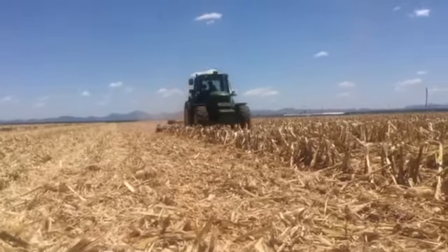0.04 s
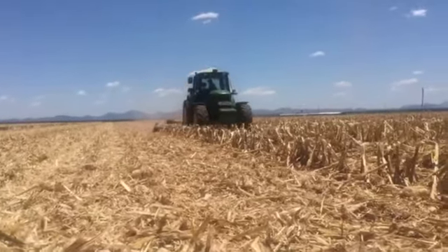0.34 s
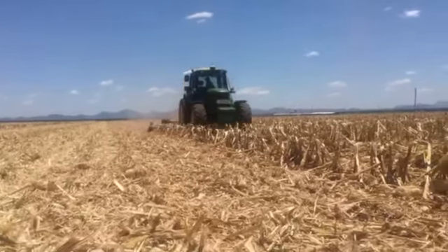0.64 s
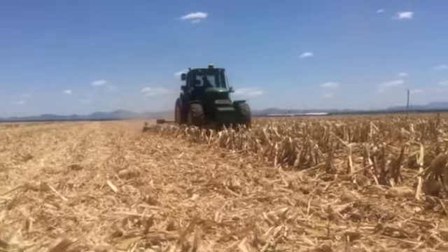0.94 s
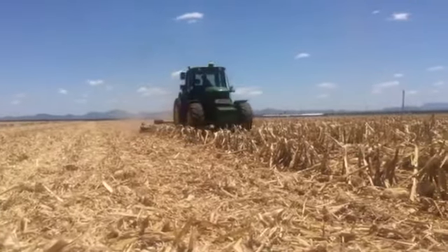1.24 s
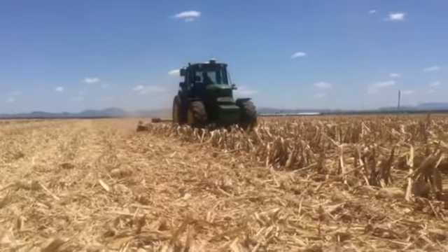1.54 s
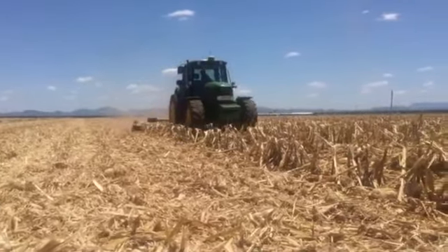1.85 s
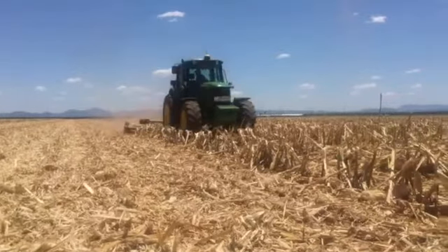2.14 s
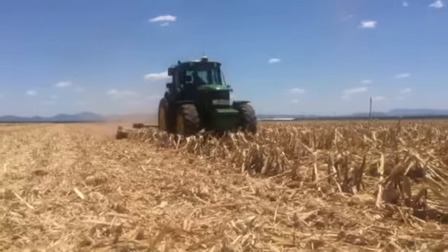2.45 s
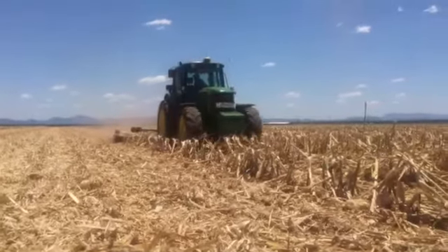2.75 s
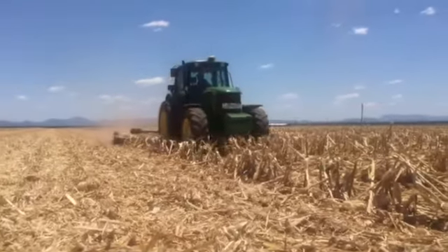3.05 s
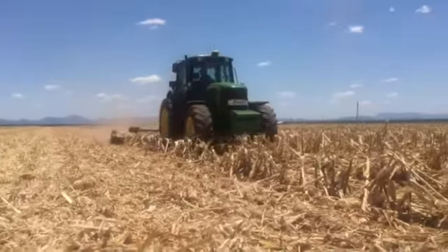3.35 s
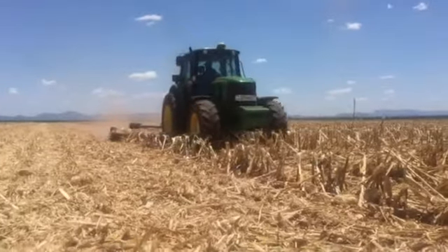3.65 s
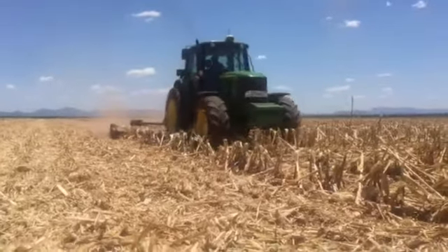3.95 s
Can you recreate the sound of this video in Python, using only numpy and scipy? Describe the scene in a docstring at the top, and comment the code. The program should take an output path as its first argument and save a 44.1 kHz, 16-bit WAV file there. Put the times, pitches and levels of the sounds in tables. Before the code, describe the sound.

A diesel tractor drones throughout the four seconds, with a low rumble, even knocking, fan hum and a faint high whistle, growing slightly louder as it approaches. Its rotary cutter roars and shreds dry stalks, the crackling hiss building from about 1.3 seconds. Debris rattles briefly on the cutter around 1.8 and 2.2 seconds, loudest at 2.4 with a sharp stone ping, then lightly between 3 and 3.4 seconds.

```python
"""A six-cylinder diesel tractor drives closer over a dry maize field, pulling a rotary cutter.
Periodic exhaust pulses make a harmonic drone, and uneven blows of the cylinders excite the block.
Injectors hiss, the cooling fan hums at its blade rate, and the turbocharger and gears whistle.
The cutter adds broadband noise: it roars and shreds stalks, debris now and then rattles on its deck,
and one stone pings off a blade."""
import sys
import numpy as np
from scipy.fft import rfft, irfft, next_fast_len
from scipy.io import wavfile
from scipy.ndimage import map_coordinates

SR = 44100
rng = np.random.default_rng(int(sys.argv[2]) if len(sys.argv) > 2 else 0)


def to_wav(s):
    """Save 16-bit WAV."""
    ch = np.atleast_2d(s).T  # columns
    pcm = np.round(np.clip(ch, -1, 1) * 32767)  # PCM
    wavfile.write(sys.argv[1], SR, pcm.astype(np.int16))


N = 176400
T = np.arange(N) / SR
CYLINDERS = 6  # firings per engine cycle

# Cutter spectra: f/Hz, relative level/dB
STONE_SPECTRUM = [(2000, -30), (3300, -14), (5000, -13), (6100, 2), (7000, -11.5), (9500, -11.5),
                  (11000, -24)]
DECK_SPECTRUM = [(600, -25), (1700, -20), (2100, 3), (2500, 3.5), (3300, 8.5), (4300, 3.5), (5000, -7),
                 (6200, -8), (7500, -13), (10000, -15)]
ROAR_SPECTRUM = [(200, -11), (450, -4.5), (610, -7), (820, -6.5), (935, -5.5), (1020, 1), (1130, 0.5),
                 (1270, -8), (1370, -2), (1600, -5), (1880, -5), (2080, -17), (2500, -15.5), (4000, -29.5),
                 (8000, -49)]
SHRED_SPECTRUM = [(900, -11.5), (1800, -2), (1980, -11), (2150, -7.5), (2290, 0.5), (2700, 0), (3300, 1),
                  (3900, -1.5), (4850, -11.5), (5600, -9), (6300, -12.5), (7400, -21), (9500, -21.5),
                  (11000, -39)]
STRAW_SPECTRUM = [(2000, -24), (4000, 0.5), (6200, 3.5), (7500, -2.5), (9600, 0.5), (10600, -27)]
# Sprays on the deck: t/s, level/dB, hold/s, T60/s
DEBRIS_SPRAYS = [(1.82, -28.5, 0.036, .15), (2.18, -29, 0.015, .1), (2.419, -22, 0.014, .09),
                 (2.451, -30, 0.011, 0.095), (2.992, -28, 0.014, .09), (3.2, -28.5, .025, .08),
                 (3.372, -30.5, 0.02, .1)]
# Crop passing through the cutter: t/s, shredding level/dB, straw level/dB
CROP_LEVELS = [(0, -34.5, -50.5), (.9, -33, -49), (1.35, -33.5, -42), (1.85, -31.5, -41.5),
               (2.7, -32.5, -41), (3.15, -31.5, -38), (4, -31, -37)]
# Turbocharger and gear whistles: t/s, f/Hz, level/dB
TURBO_TRACK = [(0, 5200, -51), (.45, 5285, -47), (.76, 5390, -50), (.84, 5760, -47), (1.05, 5684, -45.5),
               (1.6, 5610, -42.5), (1.95, 5590, -50), (2.4, 5540, -45), (3.1, 5530, -45), (3.55, 5590, -47),
               (3.75, 5580, -39), (4, 5630, -45)]
GEAR_TRACK = [(0, 3376, -48), (.5, 3444, -41), (.8, 3520, -50), (1.2, 3510, -51), (2, 3630, -62)]
# Fan hum: multiple of the blade rate, level/dB
FAN_HARMONICS = [(1, -33), (2, -42.5), (3, -45.5), (4, -59.5)]
# Swell of the hum: t/s, gain/dB
FAN_SWELL = [(0, -2.5), (.3, -0.5), (.8, 1), (1.0, 0.5), (1.5, 0.5), (2.3, -1.5), (4, -3.5)]
# Engine spectra: f/Hz, relative level/dB
INJECTOR_SPECTRUM = [(2000, -23), (3000, 2.5), (4800, -6), (6000, -0.5), (7500, -13.5), (10000, -21)]
BLOCK_RESPONSE = [(200, -19), (550, -8.5), (740, 1), (900, -0.5), (1080, 2.5), (1250, -12), (1500, -4),
                  (1850, -21), (2100, -26.5), (3000, -17), (6000, -32.5)]
RUMBLE_SPECTRUM = [(20, -41), (31, -30), (37, -18), (45, -12), (62, -6.5), (110, 2), (160, -1.5), (230, 1),
                   (310, -8.5), (400, -6), (600, -13), (1000, -41.5)]
# One blow per cylinder: place in the cycle/firings, relative level/dB
CYLINDER_BLOWS = [(.62, -3), (1.62, -9), (2.74, -0.5), (3.84, 0), (4.6, -2.5), (5.76, 2.5)]
# Tones of the block and of uneven firing: multiple of the cycle rate, level/dB at half time
BLOCK_ORDERS = [(42, -51), (48, -48), (50, -42.5), (54, -42.5), (55, -45), (60, -42), (66, -43.5),
                (70, -44), (72, -48), (76, -46), (90, -47)]
LOPE_ORDERS = [(4, -42.5), (5, -46), (7, -47.5), (9, -52), (11, -43), (21, -57.5)]
# Exhaust drone: multiple of the firing rate, level/dB at half time
EXHAUST_HARMONICS = [(1, -18), (2, -32.5), (3, -37), (4, -55), (5, -47.5)]
# Firing rate: t/s, f/Hz
FIRING_RATE = [(0.0, 90.96), (0.15, 90.41), (0.6, 89.56), (0.95, 88.22), (1.4, 90.53), (1.65, 89.7),
               (2.05, 90.25), (2.35, 89.5), (2.65, 90.41), (3.05, 89.46), (3.3, 88.79), (3.55, 89.29),
               (4.0, 88.64)]


def amp(db):
    """Amplitude ratio of a level in decibels."""
    return 10 ** (np.asarray(db) / 20)


def unit(x):
    """Normalisation to rms 1."""
    return x / np.sqrt(np.mean(x ** 2) + 1e-20)


def curves(rows):
    """Linear interpolation in time: one value per sample for each later column."""
    times, *columns = np.transpose(rows)
    return [np.interp(T, times, column) for column in columns]


def wobble(rate):
    """Smooth random modulation: a spline through rate knots a second."""
    return map_coordinates(rng.standard_normal(int(N * rate / SR) + 4), [T * rate])


def coloured(x, spectrum):
    """Minimum-phase filtering: folding the cepstrum makes the response causal."""
    size = 2 * next_fast_len(N // 2 + 8192)
    hz, db = np.transpose(spectrum)
    bins_hz = np.fft.rfftfreq(size, 1 / SR)
    log_gain = np.log(amp(np.interp(np.log1p(bins_hz), np.log1p(hz), db)))
    cepstrum = irfft(log_gain)
    cepstrum[1:size // 2] *= 2
    cepstrum[size // 2 + 1:] = 0
    return irfft(rfft(x, size) * np.exp(rfft(cepstrum)))[:N]


def noise(spectrum):
    """Spectrally shaped Gaussian noise, rms 1."""
    return unit(coloured(rng.standard_normal(N), spectrum))


def crackle(per_s, spread_db):
    """A Poisson process of snaps of widely varying size, rms 1."""
    impulses = (rng.random(N) < per_s / SR) * rng.choice([-1, 1], N)
    return unit(impulses * amp(spread_db * np.minimum(rng.standard_normal(N), 2)))


def approach(db_per_s):
    """Level rises as a source comes nearer; the gain is 1 at half time."""
    return amp(db_per_s * (T - T.mean()))


def orders(table, firings):
    """Superposition of tones phase-locked to the engine cycle."""
    cycles = firings / CYLINDERS
    return np.sqrt(2) * sum(amp(db) * np.cos(2 * np.pi * (round(k) * cycles + rng.random()))
                            for k, db in table)


def stone_ping(start_s=2.4215, level_db=-25.5, t60_s=0.04):
    """Impact excitation: a stone meets a blade in one bright, exponentially decaying crack."""
    age = np.maximum(T - start_s, 0)
    return (T > start_s) * amp(level_db - 60 * age / t60_s) * noise(STONE_SPECTRUM)


def debris(rise_s=0.0047):
    """Dense impacts of stalk and grit merge into noise bursts coloured by the deck's resonances."""
    envelope = np.zeros(N)
    for start, db, hold, t60 in DEBRIS_SPRAYS:
        age = np.maximum(T - start, 0)
        attack = 1 - np.exp(-age / rise_s)
        envelope += attack * amp(db - 60 * np.maximum(age - hold, 0) / t60)
    return envelope * noise(DECK_SPECTRUM)


def whistle(track, width_hz, waver_hz):
    """Quadrature modulation spreads a wavering tone into a narrow band of noise."""
    hz, level_db = curves(track)
    phase = 2 * np.pi * np.cumsum(hz + waver_hz * wobble(25)) / SR
    return amp(level_db) * unit(wobble(width_hz) * np.cos(phase) + wobble(width_hz) * np.sin(phase))


def injectors(firings, level_db=-44, sharpness=2.1):
    """Amplitude modulation bunches the injectors' hiss into a tick at each firing."""
    gate = np.exp(sharpness * np.cos(2 * np.pi * firings))
    return amp(level_db) * unit(gate * noise(INJECTOR_SPECTRUM)) * approach(db_per_s=2.3)


def fan(firings, blades_per_firing=3.803):
    """Periodic blade passage: the belt-driven fan hums in harmonics that follow engine speed."""
    swell_db, = curves(FAN_SWELL)
    blades = blades_per_firing * firings + 0.018 * wobble(9)
    hum = sum(amp(db + 0.31 * wobble(7.12)) * np.sin(2 * np.pi * round(k) * blades)
              for k, db in FAN_HARMONICS)
    return np.sqrt(2) * amp(swell_db) * hum


def cutter():
    """Brittle fracture of stalks and straw adds hiss and snaps to the roar of blades and gears."""
    shred_db, straw_db = curves(CROP_LEVELS)
    roar = amp(-28 + 0.54 * wobble(12)) * noise(ROAR_SPECTRUM) * approach(db_per_s=1.5)
    tearing = rng.standard_normal(N) + 0.5 * crackle(per_s=1100, spread_db=8)
    shred = amp(shred_db + 0.35 * wobble(9.3) + 1.03 * wobble(30))
    shred *= unit(coloured(tearing, SHRED_SPECTRUM))
    snapping = rng.standard_normal(N) + 0.6 * crackle(per_s=900, spread_db=7)
    straw = amp(straw_db + 0.5 * wobble(11) + 1.5 * wobble(45))
    straw *= unit(coloured(snapping, STRAW_SPECTRUM))
    return roar + shred + straw


def block(firings):
    """Forced vibration: the block radiates tones at high orders of the engine cycle."""
    return orders(BLOCK_ORDERS, firings) * approach(db_per_s=2.5)


def knock(firings, level_db=-31, scatter_db=1.6, jitter_s=0.00035, rattle=0.12, t60_s=0.014):
    """Impulse response: each cylinder excites the block once a cycle with a blow and a short rattle."""
    age = np.arange(SR // 30) / SR
    decay = amp(-60 * age / t60_s)
    force = np.zeros(N + len(age))
    for place, db in CYLINDER_BLOWS:
        for start in np.interp(np.arange(place, firings[-1], CYLINDERS), firings, T):
            at = int(np.clip((start + jitter_s * rng.standard_normal()) * SR, 0, N))
            blow = (age == 0) + rattle * decay * rng.standard_normal(len(age))
            force[at:at + len(age)] += amp(db + scatter_db * rng.standard_normal()) * blow
    return amp(level_db) * unit(coloured(force[:N], BLOCK_RESPONSE)) * approach(db_per_s=1.5)


def exhaust(firings):
    """Periodic pulses form a harmonic series; uneven firing adds a lope, and the gas flow rumbles."""
    drone = np.sqrt(2) * sum(amp(db) * np.cos(2 * np.pi * round(k) * firings)
                             for k, db in EXHAUST_HARMONICS)
    lope = orders(LOPE_ORDERS, firings)
    tones = (drone + lope) * amp(0.11 * wobble(10)) * approach(db_per_s=1.05)
    rumble = amp(-27.5) * noise(RUMBLE_SPECTRUM) * approach(db_per_s=1.26)
    return tones + rumble


def scene():
    """Superposition in mono: five engine sounds share one firing phase; whistles and cutter run free."""
    firing_hz, = curves(FIRING_RATE)
    firings = np.cumsum(firing_hz) / SR
    engine = exhaust(firings) + block(firings) + knock(firings) + injectors(firings) + fan(firings)
    turbo = whistle(TURBO_TRACK, width_hz=210, waver_hz=24.9)
    gears = whistle(GEAR_TRACK, width_hz=140, waver_hz=24.8)
    return (engine + turbo + gears + cutter() + debris() + stone_ping())[None]


def record(dry):
    """Band limiting: an ideal low-pass filter removes the highest treble."""
    cutoff_hz = 10400
    size = next_fast_len(N + 8192)
    passband = np.fft.rfftfreq(size, 1 / SR) < cutoff_hz
    return irfft(rfft(dry, size) * passband, size)[:, :N]


dry = scene()
out = record(dry)
to_wav(out)
```